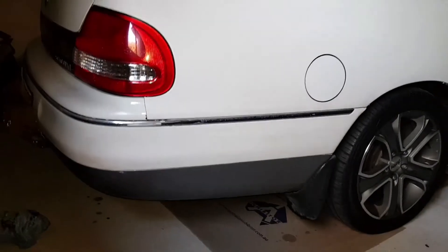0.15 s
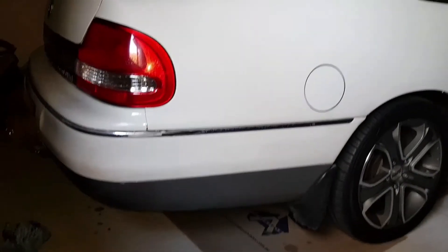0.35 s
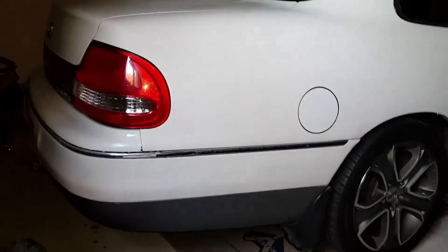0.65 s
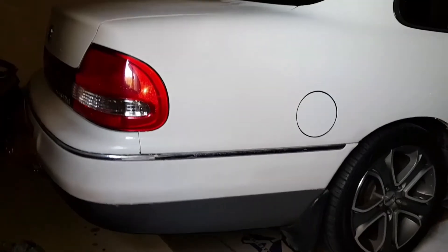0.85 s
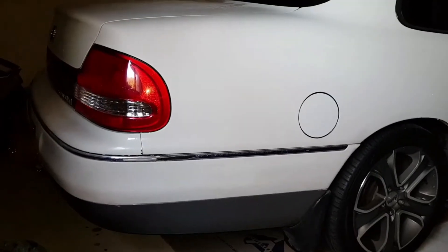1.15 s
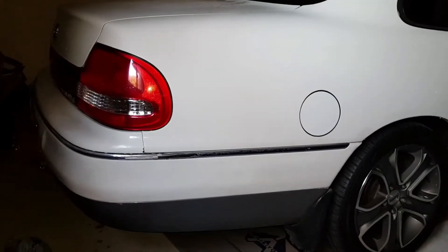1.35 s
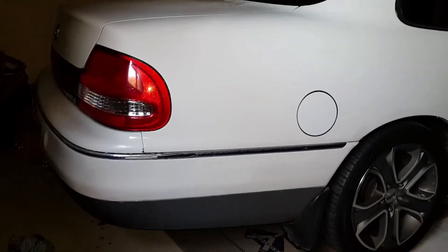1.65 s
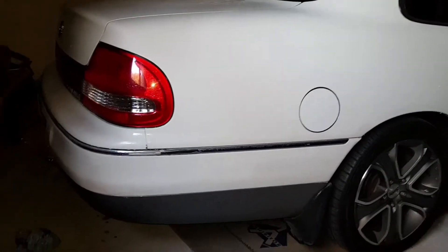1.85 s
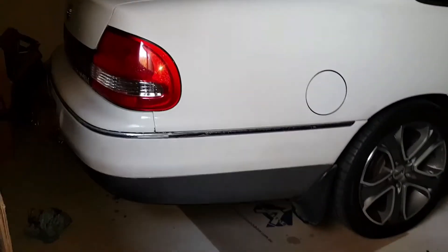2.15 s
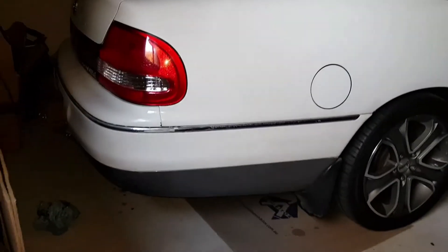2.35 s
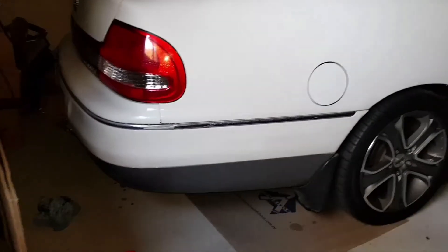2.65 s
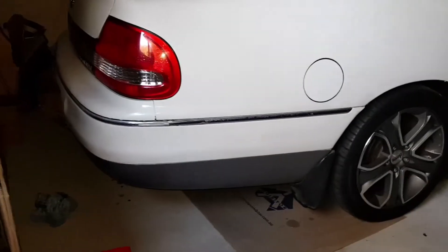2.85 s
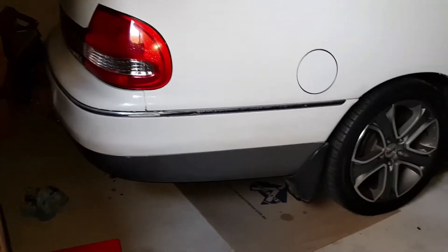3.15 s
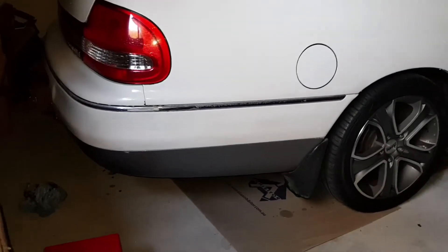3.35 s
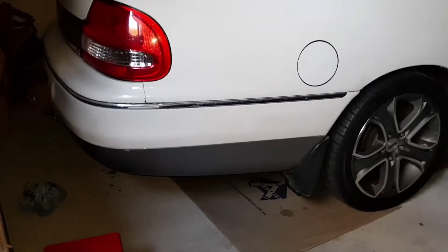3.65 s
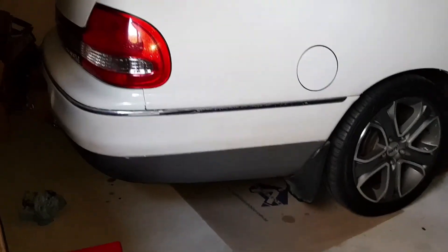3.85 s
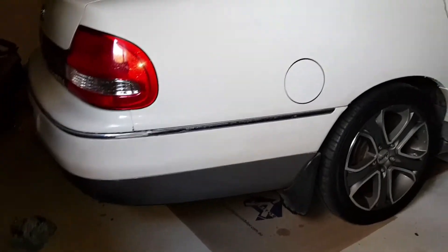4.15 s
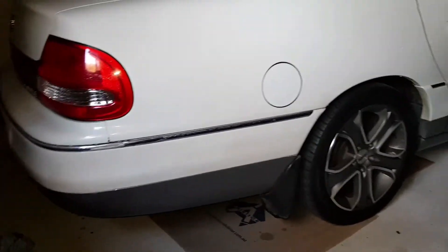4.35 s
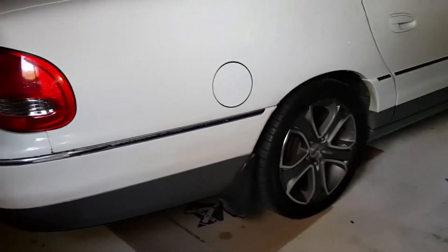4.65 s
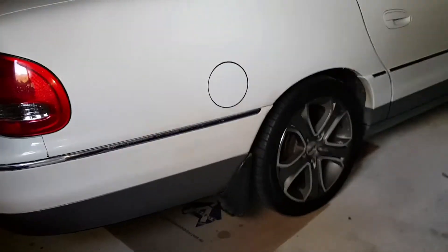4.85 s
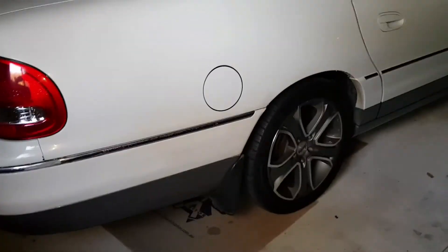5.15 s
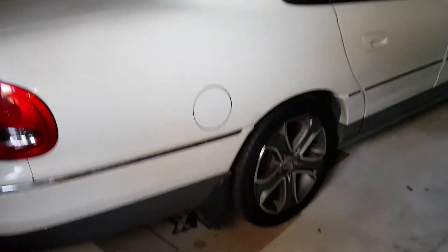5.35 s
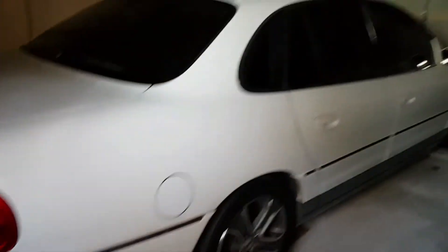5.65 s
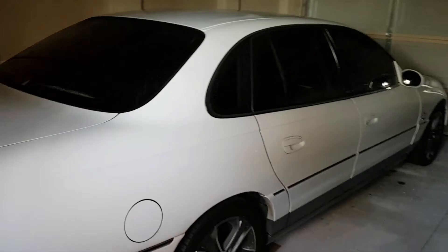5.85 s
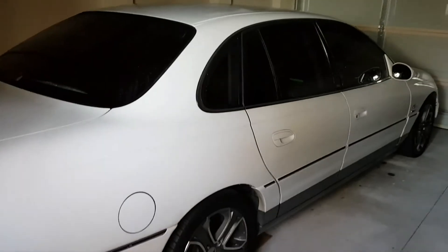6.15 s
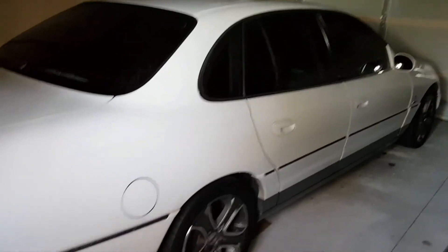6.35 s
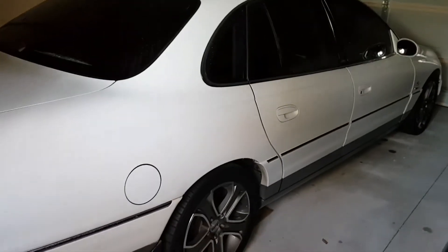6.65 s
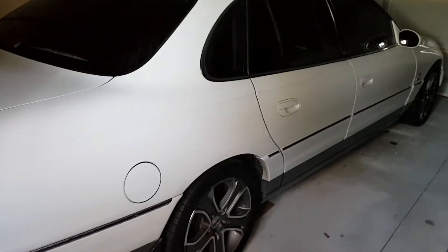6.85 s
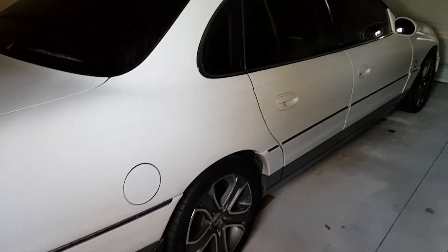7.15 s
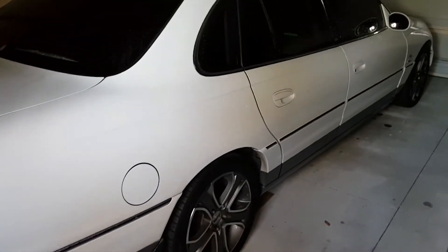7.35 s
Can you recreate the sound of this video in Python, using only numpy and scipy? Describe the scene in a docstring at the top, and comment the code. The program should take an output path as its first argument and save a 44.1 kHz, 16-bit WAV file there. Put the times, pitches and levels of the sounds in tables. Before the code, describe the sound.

Throughout, a big car engine idles in a hard-walled garage: a deep, smooth exhaust boom near 87 Hz, gently wavering, with rougher low overtones and an airy rush of belts and fan carrying a very faint high whine. From 0 to 0.35 s a finger rubs and sticks over the left microphone, swelling and brightening as it comes free. Small dry ticks cluster on the right around 1.24-1.31 s. The engine grows louder from about 2.5 s. A dull knock lands at 2.8 s, light taps at 4.15 s, a heavier thump at 4.7 s with small rattles after, then the strongest clattering knock at 5.3 s and another near 5.5 s. Soft shoe and cloth brushing accompanies movement at 4.1-5.2, 5.5-5.8 and 6.7-7.1 s. As the microphone moves toward the doors, the rush turns hollower. Light knocks at 6.7 and 6.96 s precede steady idling to 7.5 s.

```python
"""A car's deep exhaust drone over the rush of belts and fan; a finger's rub, ticks, then light knocks and brushing.
An eight-cylinder engine idles in a garage: one wandering cycle drives the exhaust partials and pulses the bay noise.
A finger sticks and slips off the left microphone, and filtered clicks tick on the camera's case.
The person filming shuffles along the car: shaped noise brushes, and noise bursts through resonances knock
against things on the floor, with garage reflections."""
import sys
import numpy as np
from scipy import signal
from scipy.fft import rfft, irfft
from scipy.io import wavfile
from scipy.ndimage import uniform_filter1d, minimum_filter1d

SR = 44100
rng = np.random.default_rng(int(sys.argv[2]) if len(sys.argv) > 2 else 0)


def generate_wav(signal):
    """Clip the signal to [-1, 1] and save it as 16-bit WAV at the path in sys.argv[1]."""
    frames = np.transpose(np.atleast_2d(signal))
    scaled = np.clip(frames, -1, 1) * 32767
    pcm = np.round(scaled).astype(np.int16)
    wavfile.write(sys.argv[1], SR, pcm)


N = 331632
T, HZ = np.arange(N) / SR, np.fft.rfftfreq(N, 1 / SR)

# Exhaust partials; uneven firing into each pipe fills in between the multiples of eight.
# Each row: multiple of the four-stroke cycle, relative level in dB behind the car, the same beside the doors.
EXHAUST_PARTIALS = [(8, -30.5, -29), (10, -43.5, -47.5), (12, -41, -46), (14, -45, -44), (20, -50.5, -55),
                    (22, -44, -50), (24, -34.5, -38), (26, -48, -59.5), (30, -47, -44), (32, -29, -29.5),
                    (36, -45.5, -53), (38, -50.5, -53), (40, -47, -49.5), (41, -48.5, -49.5),
                    (46, -41, -48.5), (47, -45.5, -43), (48, -48.5, -40), (49, -47.5, -38),
                    (51, -42.5, -45), (52, -51.5, -51)]
# Gas noise in the pipe. Each row: frequency in Hz, relative density in dB per Hz.
GAS_SPECTRUM = [(20, -10), (45, -9), (80, 4.5), (125, 0.5), (165, -4), (215, -2), (265, 4), (295, -6),
                (330, -11.5), (600, -54)]
# Boom of the tailpipe where the camera is. Each row: time in seconds, level in dB before throb and finger boost.
DRONE_LEVEL = [(0.36, -18), (1.43, -18), (1.55, -16), (2.45, -14), (2.66, -11), (3.4, -9.5), (3.58, -11.5),
               (3.68, -9), (4.48, -11.5), (4.54, -15), (4.6, -10.5), (5.23, -11), (5.63, -14.5), (6.6, -13),
               (6.72, -11.5), (6.96, -12.5), (7.02, -10.5), (7.5, -11.5)]
# Engine loudness as the camera moves round the car. Each row: time in seconds, reference level in dB.
ENGINE_LEVEL = [(0.4, -47), (1.29, -45.5), (2.54, -39.5), (2.67, -37.5), (5.21, -36.5), (5.46, -34),
                (5.66, -38), (6.13, -40), (6.87, -36), (7.5, -36.5)]
# Belts, fan and valve gear. Each row: frequency in Hz, relative density in dB per Hz.
BAY_SPECTRUM = [(180, -33.5), (300, -4), (460, -3.5), (520, -5), (720, 1), (890, -4), (1030, -4.5),
                (2100, -6), (2900, -13.5), (5380, -22), (7560, -29), (9200, -35.5), (12500, -34),
                (14500, -59)]
# Narrow resonances of the engine bay. Each row: frequency in Hz, width in Hz, boost in dB.
BAY_RESONANCES = [(463, 30, 7), (800, 290, 1.5), (886, 54, 6.5), (1562, 24, 7.5), (7580, 880, 7)]
# Left-right likeness of diffuse noise. Each row: frequency in Hz, likeness (clipped to 0..1).
STEREO_LIKENESS = [(60, 1), (130, 1), (280, 0.96), (620, 0.45), (1350, -0.35), (2950, 0.47), (6430, -0.22),
                   (14000, -0.033)]
# Left-right balance of diffuse noise. Each row: frequency in Hz, left over right in dB.
STEREO_BALANCE = [(60, 7), (130, 1), (280, -1.5), (620, 2.5), (1350, -2.5), (2950, -1.5), (6430, 1.5),
                  (14000, 3)]
# Knocks. Each row: start in seconds, relative level in dB, chatter decay in seconds, pitch in Hz of the struck
# thing, strength of that pitch in dB, relative share of sharp crack in dB, left over right in dB.
KNOCK_EVENTS = [(2.775, -22.5, 0.013, 560, 17, -39.5, 0.5), (4.140, -25.5, .004, 1760, 17, -18, -10.5),
                (4.164, -33, 0.0017, 3750, 17, -12, -4), (4.209, -28.5, 0.0046, 2380, 14, -19, -10),
                (4.682, -13, 0.021, 397, 8, -38, -9.5), (4.705, -8, 0.0057, 620, 3, -22, -3.5),
                (4.712, -15, 0.0056, 1400, -5, -6, 5), (4.824, -26, .002, 1100, 11, -21, -2),
                (4.849, -26, 0.0031, 1700, 22, -16, -12), (4.878, -27.5, 0.002, 1830, 18, -11, -13),
                (5.115, -35.5, .003, 5560, 19, 7, 2), (5.274, -14, 0.033, 1400, 7, -31, -2.5),
                (5.311, -9.5, 0.009, 1730, 7, -44, -11), (5.316, -6, 0.0022, 2040, 17, -56, -3),
                (5.326, -6, 0.0072, 490, 12, -47, 5), (5.332, -8, 0.0057, 1100, 8, -49, -3.5),
                (5.415, -14.5, 0.023, 1500, 10, -27.5, -11), (5.509, -24.5, 0.0041, 1800, 13.5, -10, -1),
                (6.663, -18.5, 0.012, 396, 19.5, -33.5, 0), (6.679, -19.5, .0085, 2980, -4, -6, -3.5),
                (6.957, -19, 0.0017, 1280, 33.5, -41, -.5), (6.965, -21, .005, 540, 20, -30, -2)]
# Dull body of a knock. Each row: frequency in Hz, relative gain in dB.
KNOCK_BODY = [(100, -17.5), (200, 11), (300, 6), (390, 5.5), (560, 3.5), (750, 7), (1400, 0), (2400, -3.5),
              (3100, -16.5), (3800, -8), (4800, -37), (7500, -42.5), (10000, -58.5)]
# Faint ring of the struck things. Each row: frequency in Hz, relative level in dB, t60 in seconds.
RING_MODES = [(479.5, 0, 0.17), (531, 3, 0.087), (987, -1.5, 0.13), (1106, -1, .15), (1385, -5, 0.14),
              (1620, -6.5, .14), (1940, -2, 0.23), (1950, -3, 0.14), (2078, -2.5, 0.19), (2215, -3, .2),
              (2440, -2, .2)]
# Garage reflections. Each row: frequency in Hz, t60 in seconds.
GARAGE_DECAY = [(150, 0.88), (500, 0.43), (1500, 0.6), (3000, 0.54), (6000, 0.51), (14000, 0.48)]
# Pushes of a finger over the left port. Each row: peak time in seconds, relative level in dB.
FINGER_PUSHES = [(0.037, -30), (.06, -35), (.14, -29), (0.172, -23.5), (.228, -24), (.261, -17.5),
                 (.288, -17.5), (0.311, -16.5), (0.332, -11)]
# Skin rub. Each row: frequency in Hz, gain in dB.
RUB_SPECTRUM = [(30, -23), (90, 11), (150, 9.5), (380, 4.0), (700, -1.5), (1400, -2.5), (2500, -1.5),
                (6500, -5.0), (9000, -13), (13000, 4)]
# Ticks on the camera's case. Each row: start in seconds, relative level in dB.
TICK_EVENTS = [(1.2372, -23), (1.286, -34), (1.2942, -9.5), (1.3012, -21), (1.3036, -24), (1.3106, -17)]
# Tone of the case. Each row: frequency in Hz, relative gain in dB.
CASE_SPECTRUM = [(150, 13), (500, 4), (1800, -2.5), (4000, -9), (7000, -28), (12000, -33), (15000, -23)]
# Brushes of shoes and clothes. Each row: start in seconds, length in seconds, level in dB.
BRUSH_STROKES = [(4.143, 0.47, -43.5), (4.684, 0.49, -43), (5.504, 0.3, -49), (6.658, 0.46, -48)]
# Tone of the brushes. Each row: frequency in Hz, relative density in dB per Hz.
BRUSH_SPECTRUM = [(200, -16), (900, -13), (2000, -1), (4000, -7), (7500, -12), (9500, -19.5),
                  (12500, -17.5), (14500, -34)]

CYLINDERS = 8
IDLE_RPM, HUNT_RMS_RPM, HUNT_RATE_HZ = 652, 3.7, 3.5
# the bay follows the engine level; the exhaust overtones follow it less steeply
BAY_OFFSET_DB, OVERTONES_OFFSET_DB, OVERTONES_FOLLOW = .5, 3, .85
WHINE_HZ, WHINE_DB = 10600, -71
# hollow note under the floor pan, relative to the engine bay, as the camera turns from tail to doors
HOLLOW_TAIL_DB, HOLLOW_DOORS_DB, TURN_AT_S, TURN_S = -16.5, -7.5, 5.3, 0.54
RESONANCE_Q = 3.2  # of a struck thing: pitch over width
PUSH_RISE_S, PUSH_FALL_S = .02, 0.0092
COVERED_HZ, OPEN_HZ, UNCOVER_S, FINGER_OFF_S = 315, 10000, 0.038, 0.3466
BRUSH_RISE_S, BRUSH_FALL_S = 0.054, 0.14
BAND_EDGE_HZ = 14600


def amp(db):
    """Decibels to gain."""
    return 10 ** (np.asarray(db) / 20)


def unit(x):
    """Scales to rms 1."""
    return x / np.sqrt(np.mean(x ** 2) + 1e-20)


def curves(rows):
    """Each column of a time table, at every sample."""
    s, *columns = np.transpose(rows)
    return [np.interp(T, s, c) for c in columns]


def read(points, hz=HZ):
    """A spectrum table on a log-frequency axis."""
    f, value = np.transpose(points)
    return np.interp(np.log(hz + 1), np.log(f + 1), value)


def colour(x, db):
    """Filters by a gain in dB for every frequency."""
    return irfft(rfft(x) * amp(db), N)


def drift(hz):
    """Slow chance of rms 1, up to about hz changes a second."""
    return unit(irfft(rfft(rng.standard_normal(N)) / (1 + (HZ / hz) ** 4), N))


def pan(db):
    """Left and right gains for a left-over-right level difference."""
    return amp(np.array([[.5], [-.5]]) * db)


def add(mix, s, sound):
    """Mixes a stereo sound in at time s."""
    part = mix[:, round(s * SR):][:, :sound.shape[1]]
    part += sound[:, :part.shape[1]]


def causal(db):
    """Minimum-phase impulse response of a spectrum."""
    log_gain = np.log(amp(np.maximum(db, -100)))
    mirrored = np.r_[log_gain, log_gain[-2:0:-1]]
    return np.fft.ifft(np.exp(signal.hilbert(mirrored).conj())).real


def diffuse():
    """Room noise: alike at both microphones in the bass, less alike higher up."""
    a, b = rfft(rng.standard_normal((2, N)))
    same = np.clip(read(STEREO_LIKENESS), 0, 1)
    right = same * a + np.sqrt(1 - same ** 2) * b
    return irfft(np.array([a, right]) * pan(read(STEREO_BALANCE)), N)


def turned():
    """0 while the camera is at the tail, 1 once it looks along the doors."""
    return .5 + .5 * np.tanh((T - TURN_AT_S) / TURN_S)


def exhaust(cycle, drone_db, overtones_db, unsteady=0.34, sway_rad=0.15, gas_db=-6.5):
    """The pipe booms at twice the firing rate; weaker partials beat and waver as no two firings burn alike."""
    boom_phase = 2 * np.pi * 2 * CYLINDERS * cycle
    # the camera moves through the room's standing waves
    port_phase = np.array([[.5], [-.5]]) * sway_rad * drift(0.69)
    drone = np.sqrt(2) * amp(drone_db) * np.cos(boom_phase + port_phase)
    drone = pan(1.15) * drone * (1 + .013 * drift(25))
    partials, doors = 0, turned()
    for order, tail_db, doors_db in EXHAUST_PARTIALS:
        order = round(order)
        depth = unsteady if order % CYLINDERS else unsteady / 2  # firing harmonics are steadiest
        waver = 1 + depth * (drift(4) + 1j * drift(4))
        level = amp(tail_db + (doors_db - tail_db) * doors)
        partials += level * waver * np.exp(2j * np.pi * (order * cycle + rng.random()))
    partials = (partials * np.exp(2j * port_phase)).real
    pulsed_gas = diffuse() * (1 + .5 * np.cos(boom_phase))
    gas = unit(colour(pulsed_gas, read(GAS_SPECTRUM)))
    overtones = amp(4.5) * pan(0.71) * unit(partials) + amp(gas_db) * gas
    return drone + amp(overtones_db) * overtones


def engine_bay(cycle, level_db, pulsing=0.018, lope=.04, hollow_hz=715, hollow_width_hz=150):
    """Rush pulses with the firings, rings in the bay and under the floor pan, and carries a thin whine."""
    beat = 1 + pulsing * np.cos(2 * np.pi * CYLINDERS * cycle) + lope * np.cos(2 * np.pi * 2 * cycle)
    resonances_db = sum(db / (1 + (2 * (HZ - hz) / width_hz) ** 2) for hz, width_hz, db in BAY_RESONANCES)
    pulsed = diffuse() * beat * amp(0.56 * drift(17))
    rush = unit(colour(pulsed, read(BAY_SPECTRUM) + resonances_db))
    hollow = unit(colour(diffuse(), -20 * np.log10(1 + ((HZ - hollow_hz) / hollow_width_hz) ** 2)))
    hollow_db = HOLLOW_TAIL_DB + (HOLLOW_DOORS_DB - HOLLOW_TAIL_DB) * turned()
    whine = []
    for side in range(2):
        cycles = np.cumsum(WHINE_HZ + 45 * drift(.7)) / SR
        whine.append((1 + .2 * drift(30)) * np.cos(2 * np.pi * cycles))
    return amp(level_db) * (amp(2.0) * rush + amp(hollow_db) * hollow) + amp(WHINE_DB) * np.array(whine)


def knocks(ring_db=-14.0):
    """Each blow chatters: a broad resonance over a dull body and a sharp crack, with a faint ring."""
    out, hz, t = np.zeros((2, N)), np.fft.rfftfreq(2048, 1 / SR) + 1, T[:SR // 3]
    for s, db, chatter_s, pitch_hz, pitch_db, crack_db, side_db in KNOCK_EVENTS:
        resonance = 1 / (1 + RESONANCE_Q ** 2 * (hz / pitch_hz - pitch_hz / hz) ** 2)
        resonance /= 1 + (hz / pitch_hz / 2) ** 4
        power = amp(pitch_db) ** 2 * resonance + amp(read(KNOCK_BODY, hz)) ** 2 + amp(crack_db - 13) ** 2
        body = causal(10 * np.log10(power))
        noise = rng.standard_normal(len(t)) + .5 * rng.standard_normal((2, len(t)))
        contact = noise * np.exp(-t / chatter_s)
        ring = 0
        for mode_hz, mode_db, t60_s in RING_MODES:
            ring += amp(mode_db - 60 * t / t60_s) * np.sin(2 * np.pi * (mode_hz * t + rng.random((2, 1))))
        blow = signal.fftconvolve(unit(contact) + amp(ring_db) * unit(ring), body[None], axes=1)
        add(out, s, amp(db + 19.5) * pan(side_db) * blow / np.linalg.norm(blow))
    return out


def garage(x, build_s=0.0023):
    """Dense reflections from bare walls, each band dying at its own speed."""
    hz, t, z = signal.stft(rng.standard_normal((2, SR)), SR, nperseg=256)
    decay = amp(-60 * t / read(GARAGE_DECAY, hz)[:, None])
    tail = signal.istft(z * decay, SR, nperseg=256)[1]
    tail *= 1 - np.exp(-T[:tail.shape[1]] / build_s)
    return signal.fftconvolve(x, tail / np.linalg.norm(tail[0]), axes=1)[:, :N]


def finger_motion(rest_db=-36, lift_s=0.012):
    """Relative level and corner in Hz of the rub: each push swells and lets go; the port opens at the end."""
    pressure = amp(rest_db)
    for s, db in FINGER_PUSHES:
        pressure = pressure + amp(db) * np.exp(np.minimum((T - s) / PUSH_RISE_S, (s - T) / PUSH_FALL_S))
    contact = np.exp(-np.maximum(T - FINGER_OFF_S, 0) / lift_s)
    corner_hz = COVERED_HZ * (1 + UNCOVER_S / np.maximum(FINGER_OFF_S - T, 1 / SR))
    return pressure * contact, np.minimum(corner_hz, OPEN_HZ)


def finger(slips_per_s=260, smooth_share=1.0, smother=2.48):
    """Skin sticks and slips over the port at uneven steps, brighter as the port comes free."""
    pressure, corner_hz = finger_motion()
    steps = np.floor(np.cumsum(slips_per_s * amp(4 * drift(150))) / SR)
    slips = np.diff(steps, prepend=steps[0]) * amp(4.7 * drift(130)) * np.sign(rng.standard_normal(N))
    friction = unit(slips) + smooth_share * rng.standard_normal(N)
    hz, t, z = signal.stft(friction, SR, nperseg=256)
    above = hz[:, None] / np.interp(t, T, corner_hz)
    shape = ((1 + above ** 2) * (1 + (above / smother) ** 4)) ** -.5  # the fingertip smothers the treble
    shape /= np.sqrt(np.mean(shape ** 2, 0))
    rub = signal.istft(z * shape, SR, nperseg=256)[1][:N]
    return pan(30.8) * amp(-17) * pressure * colour(rub, read(RUB_SPECTRUM))


def ticks():
    """Dry clicks through the case, next to the right port."""
    out = np.zeros((2, N))
    click = causal(read(CASE_SPECTRUM, np.fft.rfftfreq(1024, 1 / SR)))
    for s, db in TICK_EVENTS:
        add(out, s, pan(-30.5) * amp(db - 9.5) * click / abs(click).max())
    return out


def shuffle():
    """Soles and cloth brush with an uneven grain; each stroke swells, holds and fades."""
    strokes = 0
    for s, length_s, db in BRUSH_STROKES:
        envelope = np.minimum((T - s) / BRUSH_RISE_S, (s + length_s - T) / BRUSH_FALL_S)
        strokes = strokes + amp(db) * np.clip(envelope, 0, 1)
    grain = diffuse() * amp(0.58 * drift(90))
    return pan(0.94) * strokes * unit(colour(grain, read(BRUSH_SPECTRUM)))


def scene(throb_db=0.53, covered_boost_db=3.0):
    """One two-turn engine cycle drives exhaust and bay; the boom dips as the idle quickens."""
    hunt = drift(HUNT_RATE_HZ)
    hunt = unit(hunt - uniform_filter1d(hunt, SR // 2))  # the idle control pulls the speed back
    cycle = np.cumsum(IDLE_RPM + HUNT_RMS_RPM * hunt) / SR / 60 / 2
    drone_db = curves(DRONE_LEVEL)[0] - throb_db * hunt
    drone_db += covered_boost_db * np.clip((FINGER_OFF_S - T) / UNCOVER_S, 0, 1)  # boomier under the finger
    engine_db = curves(ENGINE_LEVEL)[0]
    car = exhaust(cycle, drone_db, OVERTONES_OFFSET_DB + OVERTONES_FOLLOW * engine_db)
    car += engine_bay(cycle, engine_db + BAY_OFFSET_DB)
    blows = knocks()
    return car + blows + garage(blows) + finger() + ticks() + shuffle()


def record(dry):
    """A quick limiter holds each channel to full scale; a low-pass then limits the band."""
    gain = 1 / np.maximum(abs(dry), 1)
    gain = uniform_filter1d(minimum_filter1d(gain, size=129), size=129)
    lowpass = signal.firwin(511, BAND_EDGE_HZ, window=("kaiser", 9), fs=SR)
    return signal.oaconvolve(dry * gain, lowpass[None], "same")


dry = scene()
out = record(dry)
generate_wav(out)
```